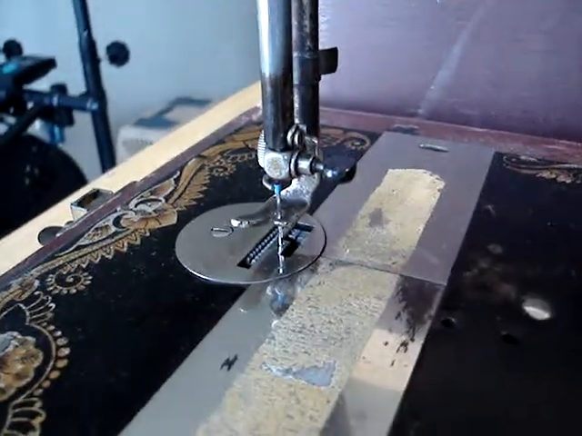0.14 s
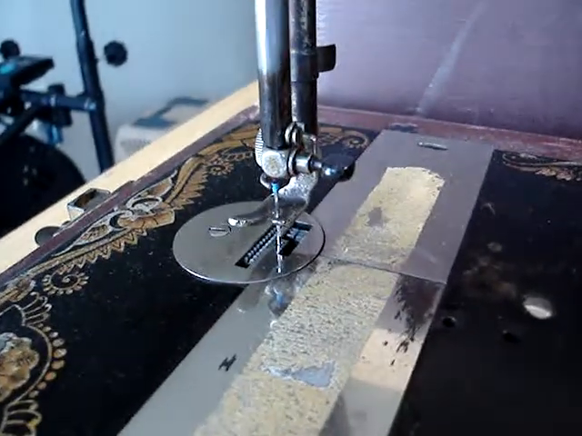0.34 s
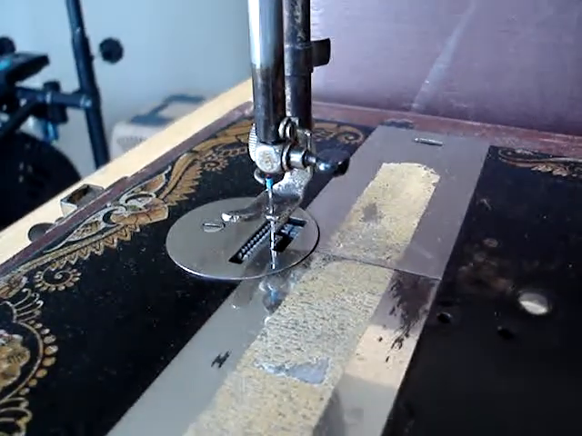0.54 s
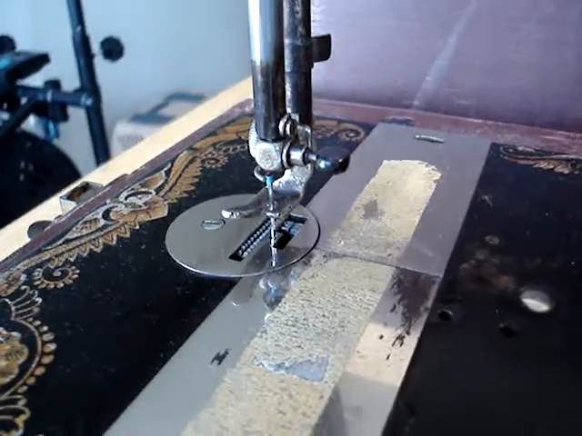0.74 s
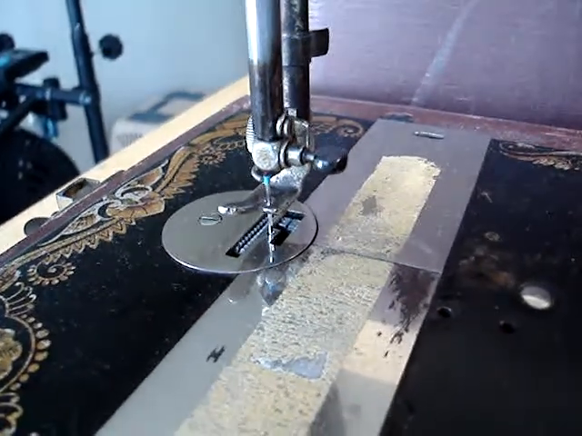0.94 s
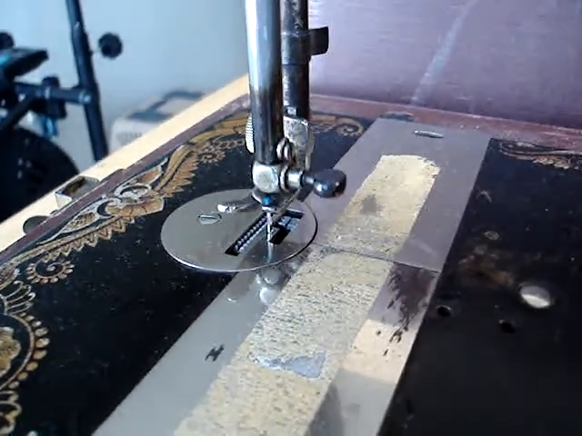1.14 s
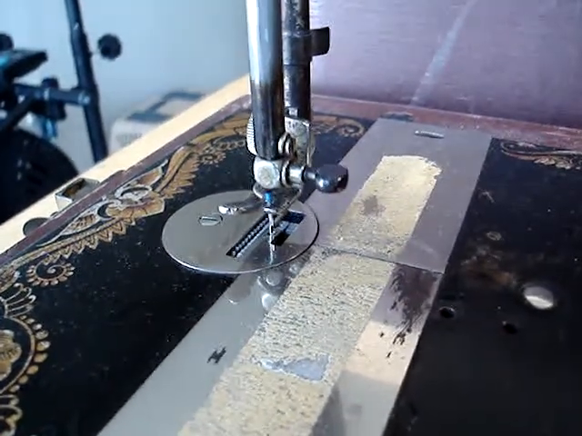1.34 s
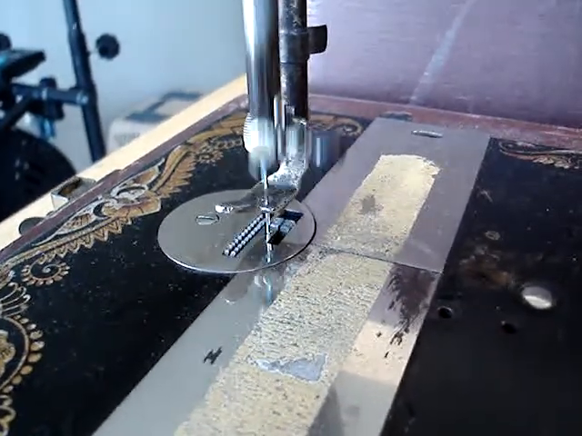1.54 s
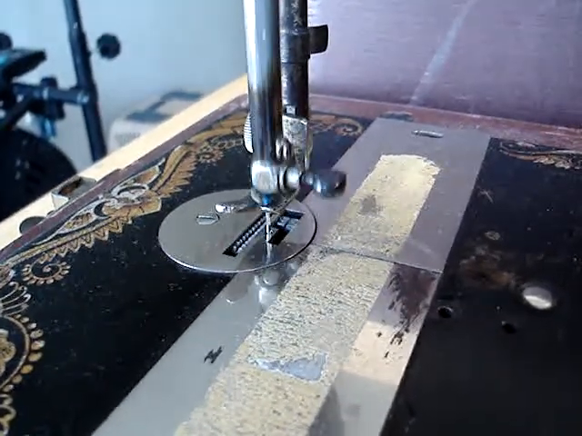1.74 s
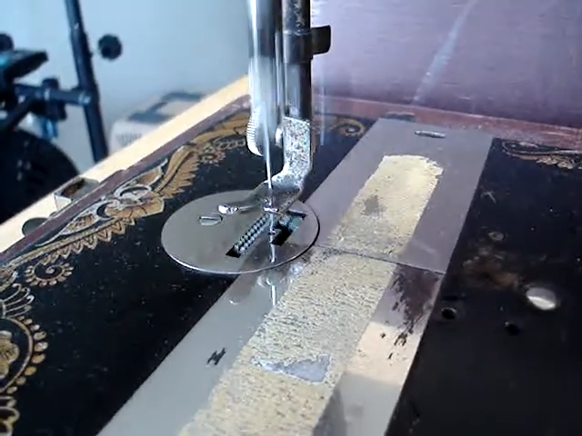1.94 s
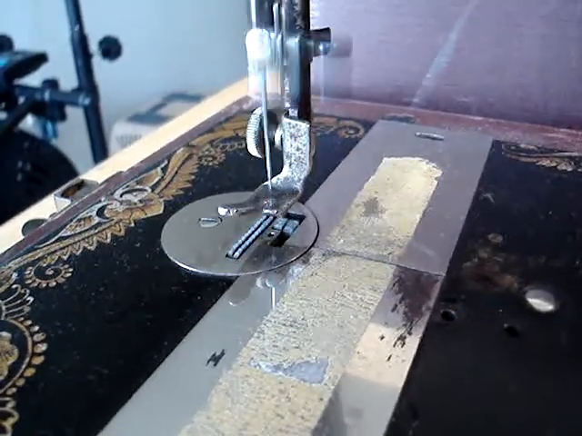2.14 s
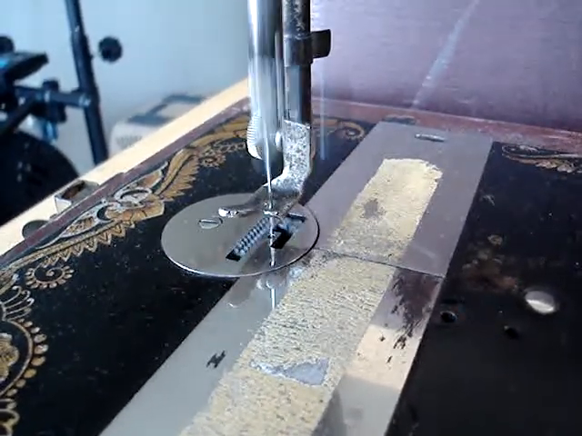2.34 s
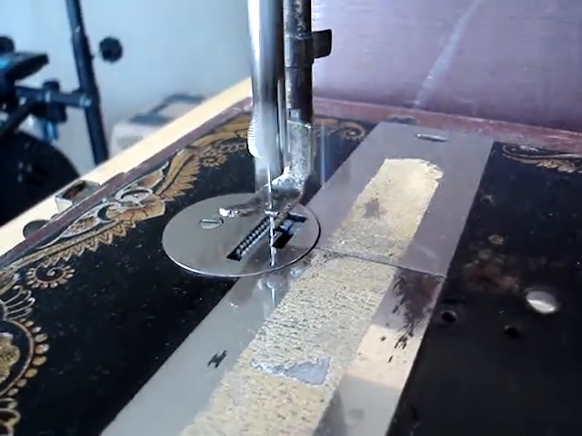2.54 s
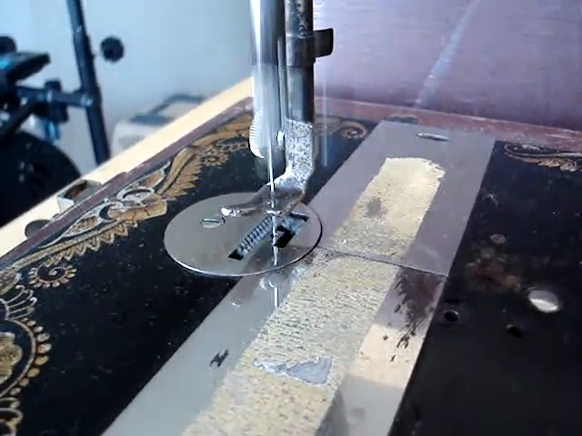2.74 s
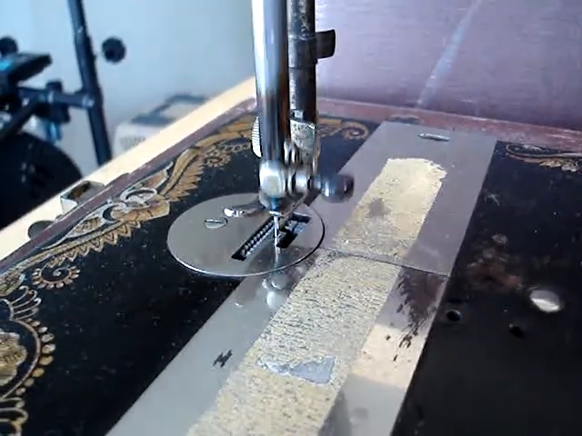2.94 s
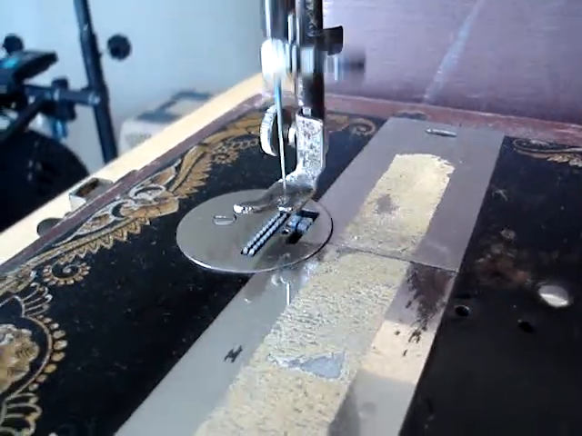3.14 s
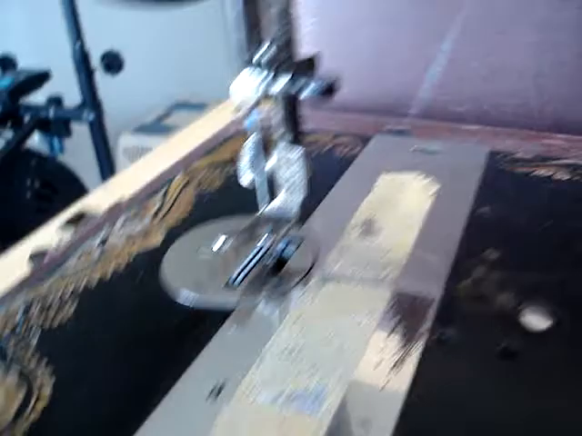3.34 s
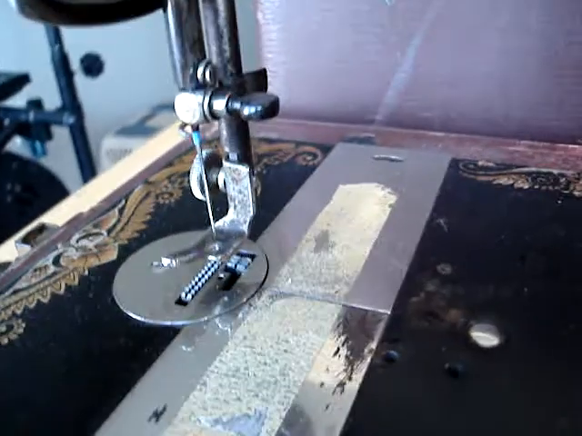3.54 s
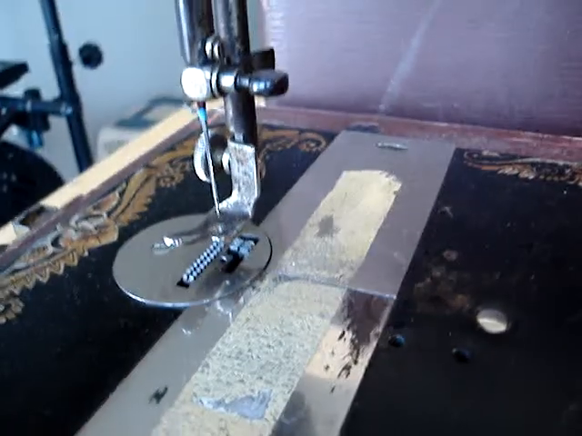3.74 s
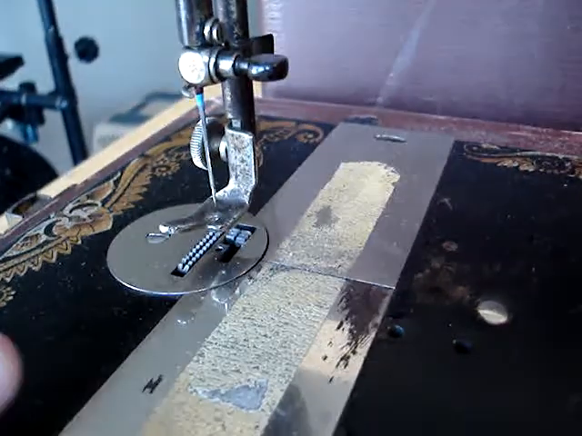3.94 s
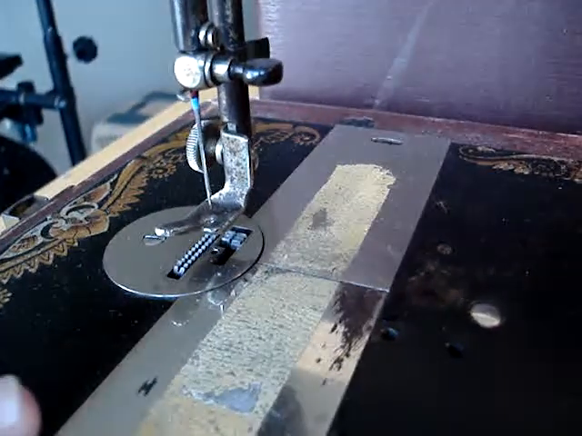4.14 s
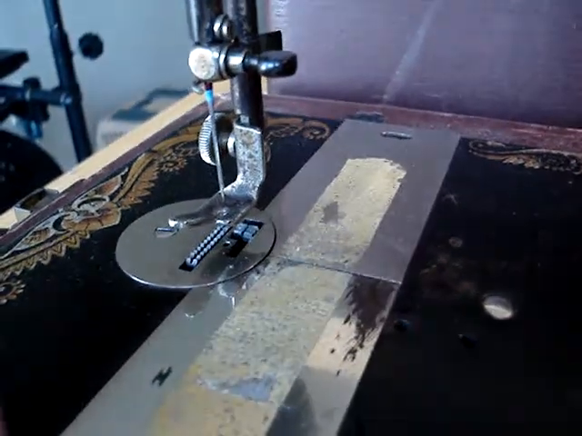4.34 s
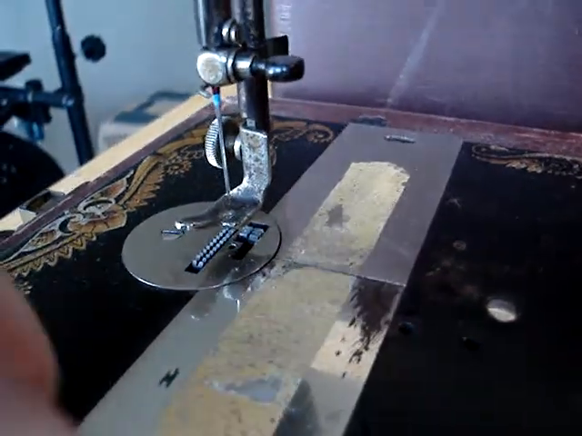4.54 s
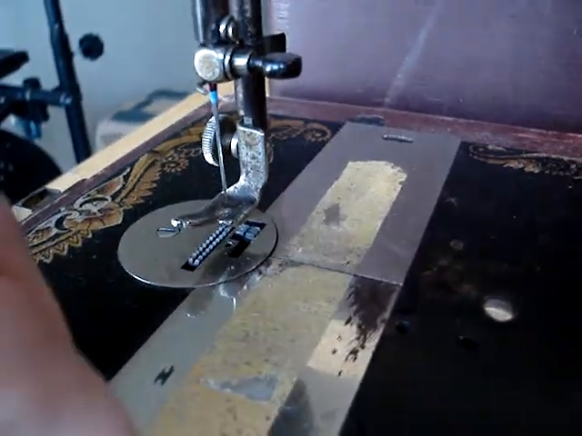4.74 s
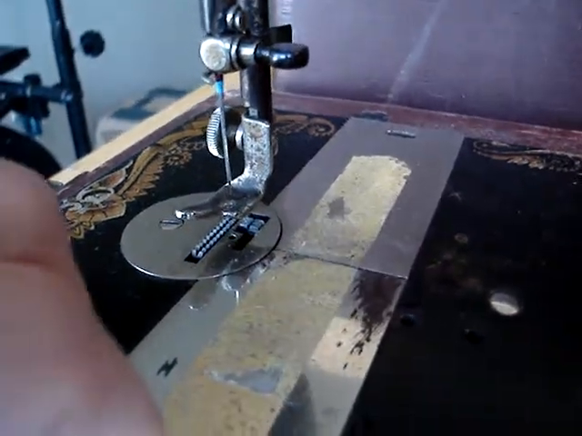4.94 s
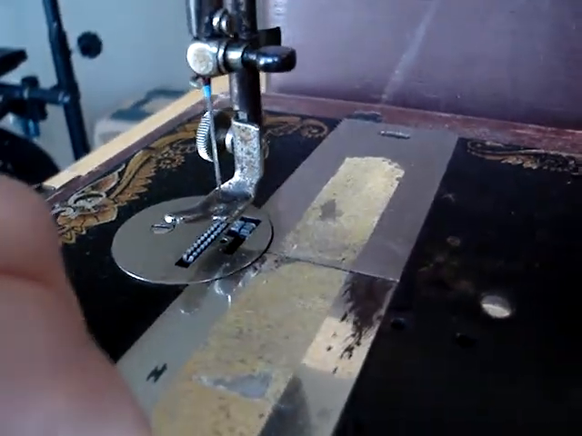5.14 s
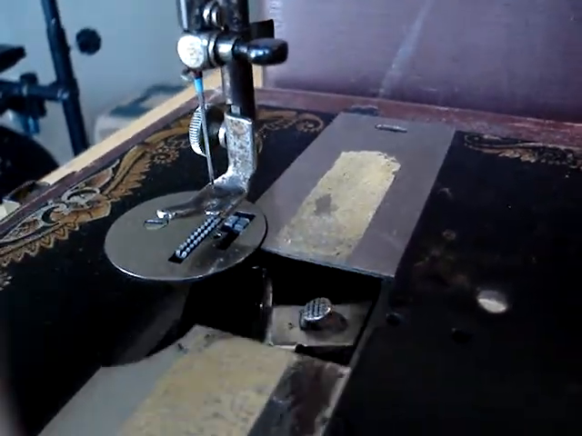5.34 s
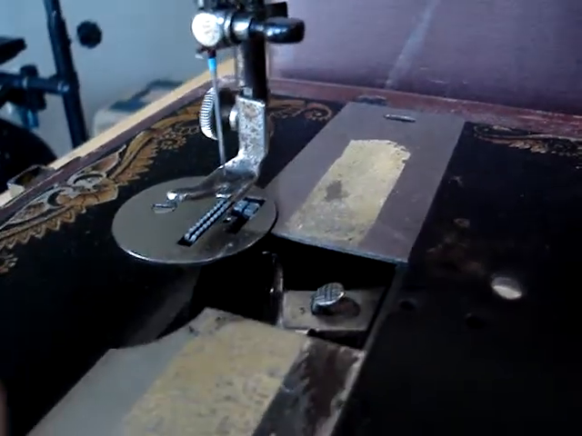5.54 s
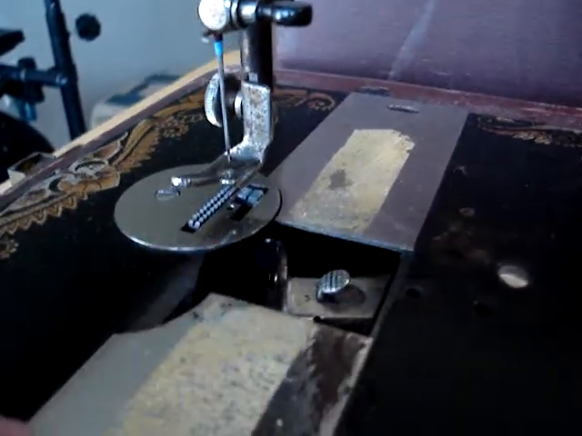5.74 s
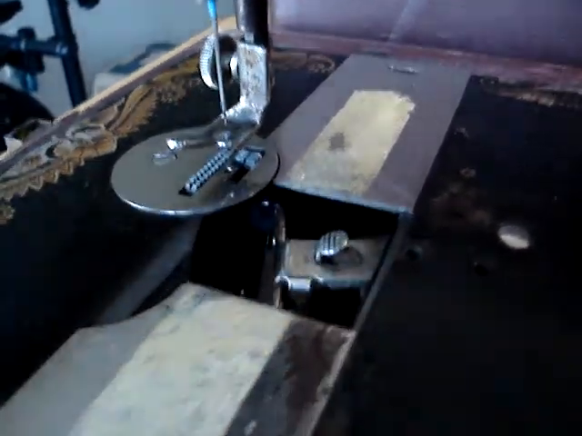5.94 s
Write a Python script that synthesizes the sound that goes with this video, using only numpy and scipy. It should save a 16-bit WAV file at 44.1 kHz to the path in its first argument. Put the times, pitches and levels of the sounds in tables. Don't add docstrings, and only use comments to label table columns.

```python
import sys
import numpy as np
from scipy import signal
from scipy.fft import rfft, irfft
from scipy.io import wavfile
from scipy.ndimage import uniform_filter1d, minimum_filter1d

SR = 44100
rng = np.random.default_rng(int(sys.argv[2]) if len(sys.argv) > 2 else 0)


def waveform_to_disk(signal):
    frames = np.transpose(np.atleast_2d(signal))
    scaled = np.clip(frames, -1, 1) * 32767
    samples = np.round(scaled).astype(np.int16)
    wavfile.write(sys.argv[1], SR, samples)


def gain_from_db(level_db):
    decades = np.asarray(level_db, float) / 20
    return 10 ** decades


N = 268128
TIME = np.arange(N) / SR


def unit(x):
    return x / np.sqrt(np.mean(x ** 2))


def gain(table):
    rows = np.array(table)
    return gain_from_db(np.interp(TIME, rows[:, 0], rows[:, 1], left=-150, right=-150))


def swell(rows, attack_s, release_s):
    total = 0
    for s, hold, db in rows:
        outside = np.maximum((s - TIME) / attack_s, (TIME - s - hold) / release_s)
        total = total + gain_from_db(db - 20 * np.clip(outside, 0, 8))
    return total


def bumps(moments, width_s):
    return sum(np.exp(-((TIME - s) / width_s) ** 2) for s in moments)


def ring(x, hz, width_hz):
    return signal.lfilter(*signal.iirpeak(hz, hz / width_hz, fs=SR), x)


def band(x, lo_hz, hi_hz):
    return signal.sosfilt(signal.butter(3, [lo_hz, hi_hz], "band", fs=SR, output="sos"), x)


def colour(x, points):
    hz, db = np.transpose(points)
    grid = np.maximum(np.arange(2049) * SR / 4096, 1)
    cep = irfft(np.log(gain_from_db(np.interp(np.log(grid), np.log(hz), db))))
    cep[1:2048] *= 2
    cep[2049:] = 0
    return signal.fftconvolve(x, irfft(np.exp(rfft(cep))))[:len(x)]


def walk(rate):
    k = int(SR / rate)
    steps = np.repeat(rng.standard_normal(N // k + 1), k)
    return unit(uniform_filter1d(uniform_filter1d(steps, k), k)[:N])


def grit(per_s, scatter_db):
    chance = rng.random((2, N))
    size = gain_from_db(scatter_db * np.minimum(-np.log(1 - chance[1]), 3))
    return unit((chance[0] < per_s / SR) * size * rng.standard_normal(N).clip(-2.5, 2.5))


def burst(decay_s, size=4096):
    return rng.standard_normal(size) * np.exp(-np.arange(size) / SR / decay_s)


def add(track, s, sound):
    i = int(s * SR)
    track[i:i + len(sound)] += sound[:N - i]


def strike(track, s, size):
    i, part = (s * SR).astype(int), s * SR % 1
    np.add.at(track, i, size * (1 - part))
    np.add.at(track, i + 1, size * part)


# f/Hz, spectral level/dB
ROOM_COLOUR = [(12, -41), (20, -18), (112, -21), (141, -8.5), (269, -2.5), (318, -5.5), (393, -3.5),
               (597, -7.5), (649, -10), (691, -11.5), (1010, -12.5), (1470, -21.5), (3000, -33.5),
               (3900, -68), (6600, -120)]
# f/Hz, width/Hz, level/dB
FAN_LINES = [(275.6, 2.5, -12), (393.3, 1.9, -15.5), (956, 3.7, -19)]
# f/Hz, spectral level/dB
HISS_COLOUR = [(600, -27), (1500, 1), (3000, 1.5), (6000, -4), (8000, -4), (10000, -11), (13000, -63.5)]


def room():
    duck_from_s, duck_to_s, duck_db, recover_db_per_s = 2.8, 2.83, -9, 4.5
    bass_duck_db, bass_back_s, hiss_duck = -9.5, 1, 0.25
    rumble_db, mic_hiss_db = -41, -57.5
    since = np.maximum(TIME - duck_to_s, 0)
    onset = np.clip((TIME - duck_from_s) / (duck_to_s - duck_from_s), 0, 1)
    duck = np.minimum(duck_db * onset + recover_db_per_s * since, 0)
    air = colour(rng.standard_normal(N), ROOM_COLOUR)
    bass_db = bass_duck_db * onset * np.exp(-since / bass_back_s)
    air = air + ring(air, 150, 240) * (gain_from_db(bass_db) - 1)
    flicker = sum(ring(air, hz, 0.63 * hz) * (gain_from_db(1.85 * walk(9.2)) - 1) for hz in [120, 300, 600, 1200])
    tones = sum(gain_from_db(db) * unit(ring(rng.standard_normal(N), hz, width)) for hz, width, db in FAN_LINES)
    fan_cycle = np.cumsum(647.6 + 1.66 * walk(8)) / SR
    tones = tones + gain_from_db(-7.5 + 0.66 * walk(12)) * np.sqrt(2) * np.sin(2 * np.pi * fan_cycle)
    hiss = unit(colour(rng.standard_normal(N), HISS_COLOUR))
    return (unit(air + flicker) + tones) * gain_from_db(rumble_db + duck) + hiss * gain_from_db(mic_hiss_db + hiss_duck * duck)


# t/s, hold/s, level/dB
SHAKE = [
    (1.82, 0.0082, -31),
    (1.892, 0.015, -35),
    (2.008, 0.1, -38.5),
    (2.2, 0.12, -56),
    (2.5, 0.028, -64),
]


def table_shake():
    return unit(band(rng.standard_normal(N), 8.5, 63)) * swell(SHAKE, 0.025, 0.047)


# t/s, peak level/dB, f/Hz, treble level/dB, treble f/Hz
TAPS = [(1.0837, -34, 1430, -23, 4030), (1.133, -18, 1480, -17, 5160), (3.215, -26.5, 900, 0.5, 3430),
        (3.222, -25, 510, -7, 3400), (3.285, -31, 1900, -6, 2700), (3.289, -36.5, 2320, -5, 2700),
        (3.292, -28, 1750, -8, 2800), (3.3105, -23.5, 2350, -8.5, 6100), (3.321, -29.5, 2450, -8, 3700),
        (4.3152, -42, 2300, 1, 3200), (4.538, -19.5, 1690, -11.5, 6340), (4.5455, -24, 1730, -19, 3000),
        (4.556, -33, 1720, -12, 3000), (4.567, -40, 1800, -5, 3400), (4.911, -36, 1050, -24, 3550),
        (5.342, -17.5, 440, -4, 1500), (5.3456, -23.5, 1210, -4, 2880), (5.353, -18.5, 940, -3.5, 2980),
        (5.3685, -10, 970, -1, 2970), (5.377, -25, 1310, -4, 3100), (5.373, -19.5, 1090, -6.5, 2400),
        (5.383, -27, 1000, -3, 3000), (5.388, -28, 900, -17, 2700), (5.838, -38, 1110, -6.5, 3990),
        (5.9258, -29, 1140, -11, 4500)]


def taps():
    out = np.zeros(N)
    for s, db, hz, top_db, top_hz in TAPS:
        tone = ring(ring(burst(.0006) + .1 * burst(.007), hz, 280), hz, 420)
        tone = tone + .35 * ring(tone, hz, 60)
        snap = ring(burst(0.0027), top_hz, 710) + 0.16 * band(burst(0.0016), 1800, 8000)
        snap = snap / np.abs(snap).max() + 1.5 * band(burst(.00008), 700, 7000)
        tap = 0.48 * tone / np.abs(tone).max() + gain_from_db(top_db) * snap / np.abs(snap).max()
        add(out, s, gain_from_db(db) * tap)
    return out


# t/s, hold/s, level/dB
SLIDE = [
    (5.312, 0.011, -48.5),
    (5.344, 0.013, -26),
    (5.41, 0.018, -45.5),
    (5.44, .03, -51),
]
# t/s, hold/s, level/dB
JERK = [
    (5.371, 0.015, -25.5),
    (5.394, 0.0076, -38),
]
# t/s, hold/s, level/dB
WHINE = [
    (5.957, 0.021, -46.5),
    (5.992, 0.011, -44.5),
    (6.018, .006, -54),
    (6.04, .012, -52),
]
# t/s, hold/s, level/dB
BRUSH = [
    (4.26, 0.39, -63),
    (5.93, 0.1, -52.5),
]
# f/Hz, spectral level/dB
PLATE_COLOUR = [(35, -47), (60, -24), (204, -46), (270, -10), (415, -5.5), (774, -14.5), (919, -7.5),
                (2080, -20), (2810, -16.5), (4510, -20), (5350, -17), (8410, -22), (10200, -44.5),
                (13300, -72.5), (22000, -120)]


def sliding_plate():
    scrape = colour(grit(9000, 1.0), PLATE_COLOUR)
    scrape = scrape + 1.15 * ring(scrape, 2780, 430) + 0.91 * ring(scrape, 1340, 306)
    scrape = scrape * gain_from_db(1.0 * walk(120))
    push = swell(SLIDE, 0.023, 0.015) + swell(JERK, 0.0056, 0.0091)
    brush = band(grit(6000, 1.2), 2300, 5800)
    rasp = grit(6500, 1.2)
    whine = ring(ring(rasp, 2780, 170), 2960, 400) + .25 * ring(rasp, 4800, 200)
    whine = unit(whine + 0.1 * band(rasp, 2600, 5500)) * swell(WHINE, .008, .012)
    return whine + unit(scrape) * push + unit(brush) * swell(BRUSH, 0.028, .1)


# t/s, hum level/dB
HUM = [
    (0.2, -79.5),
    (0.27, -52.5),
    (0.45, -59),
    (0.53, -47),
    (1.15, -34.5),
    (1.87, -32),
    (2.29, -51),
    (2.82, -54.5),
    (2.9, -71),
]
# t/s, hold/s, level/dB
BUZZ = [
    (.562, 0.34, -38.5),
]
# t/s, hold/s, share level/dB
BUZZ_ROUGH = [
    (.66, .03, -1),
    (.735, .01, -9),
    (.855, .05, -1),
]
# t/s, lag/ms
BUZZ_LAG = [(.53, -3.5), (.57, -1.6), (.68, -0.5), (.73, -1), (.75, -0.2), (.79, -1.2), (.84, -1.5),
            (.9, -2), (.93, -3.2)]
# f/Hz, spectral level/dB
BUZZ_COLOUR = [(880, -68), (1500, -38), (1660, -9), (1900, -4), (2060, -3), (2160, -33), (2620, -4.5),
               (2920, -1), (3340, -8), (4280, -8), (4700, -19.5), (7570, -21.5), (10000, -24.5),
               (13000, -67), (22000, -120)]
# f/Hz, width/Hz, level/dB
BUZZ_TREBLE = [(3720, 150, -5), (5320, 200, -11), (6500, 160, -15), (7280, 310, -13), (8500, 250, -15)]
# multiple of the hum [1], level/dB
BUZZ_ORDERS = [(6, -11), (10, -13), (15, -21), (17, -16)]


def motor():
    hum_hz = 119.9
    cycle = hum_hz * TIME
    hum = np.sqrt(2) * (np.sin(2 * np.pi * cycle) + gain_from_db(-22) * np.sin(4 * np.pi * cycle))
    beats = (np.arange(int(cycle[-1])) + 0.36) / hum_hz
    beats = beats + np.interp(beats, *np.transpose(BUZZ_LAG)) / 1000
    chance = rng.standard_normal((len(beats), 3)).T
    polarity = np.arange(len(beats)) % 2
    uneven = swell(BUZZ_ROUGH, 0.042, 0.027)[(beats * SR).astype(int).clip(0, N - 1)]
    beats = beats + uneven * (.00011 * polarity + .00003 * chance[0])
    beats = beats + .00008 * walk(11)[(beats * SR).astype(int).clip(0, N - 1)]
    ticks, rebound, sharp = np.zeros((3, N + SR))
    strike(ticks, beats, gain_from_db(.9 * chance[1]))
    strike(ticks, beats - .00033, gain_from_db(-4 + chance[2]))
    strike(ticks, beats - .00068, gain_from_db(-10 + 2 * chance[0]))
    strike(rebound, beats + .0012 + .00004 * chance[2], gain_from_db(1.5 * chance[0]))
    strike(ticks, beats + .0018 + .00004 * uneven * chance[2], gain_from_db(-7))
    strike(ticks, beats + .0047 + .0001 * uneven * chance[1], gain_from_db(-15))
    strike(sharp, beats, gain_from_db(1.5 * chance[2]))
    breeze = gain_from_db(-41) * rng.standard_normal(N)
    puff = signal.fftconvolve(ticks, np.hanning(90))[:N] + .5
    fizz = band(puff * rng.standard_normal(N), 4300, 9000)
    buzz = colour(band(ticks[:N], 600, 4800) + breeze + gain_from_db(-21) * fizz, BUZZ_COLOUR)
    buzz = unit(buzz + .6 * ring(buzz, 3050, 300) + 1.2 * ring(buzz, 2420, 130))
    buzz = unit(buzz + gain_from_db(-8.5) * unit(ring(ring(rebound[:N], 2500, 300), 2500, 340)))
    treble = sum(gain_from_db(db) * unit(ring(sharp[:N], hz, width)) for hz, width, db in BUZZ_TREBLE)
    windings = sum(gain_from_db(db) * np.sin(2 * np.pi * order * cycle) for order, db in BUZZ_ORDERS)
    buzz = buzz + gain_from_db(-9.5) * treble + windings
    return hum * gain(HUM) + buzz * swell(BUZZ, 0.034, 0.062)


# shuttle catch t/s, needle bar drop t/s, strength level/dB
STITCHES = [
    (1.7955, 1.896, -2),
    (2.0426, 2.1224, -4.5),
    (2.247, 2.314, -2),
    (2.435, 2.512, -3),
    (2.61, 2.687, 0),
    (2.811, 2.867, -3),
    (2.983, 3.087, -4),
]


def moment(turn):
    catch_turn = .61
    turns = np.arange(len(STITCHES))[:, None] + [catch_turn - 1, 0]
    return np.interp(turn, turns.ravel(), np.array(STITCHES)[:, :2].ravel())


def squeal(rows, hz, waver_hz, patchy_db, scrape_db, sag=.045):
    knots = []
    for s, hold, _ in rows:
        knots += [(s - .045, 0), (s, 1), (s + hold + .012, 0)]
    pull = np.interp(TIME, *np.array(sorted(knots)).T)
    pitch = hz * (1 + sag * (pull - .5)) + waver_hz * walk(90)
    tone = np.sqrt(2) * np.sin(2 * np.pi * np.cumsum(pitch) / SR) * gain_from_db(patchy_db * walk(140))
    scrape = unit(ring(grit(8000, 1), hz, 130))
    return (tone + gain_from_db(scrape_db) * scrape) * swell(rows, 0.03, 0.017)


# t/s, hold/s, level/dB
SQUEAL_LOW = [
    (.965, 0.071, -53.5),
    (1.06, 0.023, -48.5),
    (1.1, 0.069, -39.5),
    (1.21, 0.0384, -47.5),
    (1.3, 0.017, -40),
    (1.4, 0.042, -46),
]
SQUEAL_MID = [
    (1.505, 0.013, -56),
    (1.6, 0.0748, -51),
    (3.1, 0.11, -48.5),
]
SQUEAL_HIGH = [
    (1.395, .075, -50),
    (1.51, 0.04, -43),
    (1.585, .05, -40.5),
               (3.1, .09, -46),
]
# t/s, hold/s, level/dB
SQUEAL_FIRST = [
    (1.845, .04, -34.5),
    (2.1, 0.014, -37),
    (2.665, 0.017, -35),
    (2.85, .012, -37),
]
# t/s, hold/s, level/dB
SQUEAL_END = [
    (1.635, 0.055, -40.5),
    (3.2, 0.069, -52.5),
]


def bearings():
    def sing(db):
        return [(moment(k), moment(k + .145) - moment(k), db + STITCHES[k][2]) for k in range(len(STITCHES) - 1)]

    low = squeal(SQUEAL_LOW, 1470, 25.3, patchy_db=2.0, scrape_db=-5, sag=.02)
    mid = squeal(SQUEAL_MID + sing(-43), 3125, 32, patchy_db=3, scrape_db=-6)
    high = squeal(SQUEAL_HIGH + sing(-31.5), 4215, 28, patchy_db=2.5, scrape_db=-8)
    high = high + squeal(SQUEAL_FIRST, 4240, 25, patchy_db=5.0, scrape_db=-6.5, sag=0.0089)
    return low + mid + high + squeal(SQUEAL_END, 3500, 40, patchy_db=2.5, scrape_db=-2, sag=0.012)


# f/Hz, spectral level/dB
IRON_COLOUR = [(71, -21), (120, -7), (191, -0.5), (226, -10), (334, 1), (394, 1), (639, -7), (980, -2),
               (1560, 5.5), (1810, -0.5), (2630, 0.5), (4260, 3.5), (6060, -3.5), (8470, -21), (10200, -86),
               (13300, -43.5), (22000, -120)]
# f/Hz, width/Hz, level/dB
IRON_MODES = [(177, 12, -21), (337, 23, -15), (800.4, 25, -6), (996, 18, -4), (1162, 130, -14),
              (1480, 180, -43.5), (1996, 55, -12), (2520, 210, -7), (2715, 150, -5.5), (3130, 140, -2),
              (3500, 110, -12), (4230, 170, -9.5), (5200, 15, -4.5), (6840, 79, 6.5)]


def iron(x, modes_db, patchy_db):
    broad = colour(x, IRON_COLOUR)
    modes = 0
    for hz, width, db in IRON_MODES:
        coupling = gain_from_db(patchy_db * min(hz / 2000, 1) * walk(25.17))
        modes = modes + gain_from_db(db) * ring(broad * coupling, hz, width)
    return broad + gain_from_db(modes_db) * modes


# t/s, bright level/dB
RUB = [
    (0.9, -58.5),
    (1.15, -53),
    (1.53, -41),
    (1.81, -26.5),
    (1.96, -25),
    (2.88, -28),
    (3.06, -30.5),
    (3.26, -53.5),
    (3.32, -61),
]
# f/Hz, spectral level/dB
RUB_HISS = [(4000, -4.5), (5200, 6.5), (6300, 1.5), (7200, 6.5), (8400, 5.5), (9300, -3), (10200, -26)]
# t/s, hold/s, level/dB
BELT_SLIP = [
    (1.58, 0.07, -44.5),
    (3.16, 0.044, -47.5),
]
HARD_S = [1.177, 1.795, 2.042, 2.617, 2.6895, 2.7964, 2.9846]


def rubbing():
    slack = moment(np.arange(len(STITCHES) - 1) + .235)
    flights = [row[0] - .008 for row in BLOWS + stitching()]
    load_db = -4 * bumps(slack, 0.012) - 1 * bumps(flights, 0.0038)
    load_db = load_db - 2 * bumps(np.array(HARD_S) - 0.0033, 0.0031)
    chatter = sum((TIME > s) * np.exp(-np.abs(TIME - s) / 0.01) for s, *_ in CAMS)
    load = gain_from_db(load_db + 3 * chatter - 1.5)
    effort = gain(RUB) / gain_from_db(-26)
    running = effort > 1e-4
    contact = iron(grit(7000, 1.7) * gain_from_db(1.3 * walk(130)), modes_db=9, patchy_db=2.5)
    bright = unit(band(contact, 2270, 6420)) * gain_from_db(1.0 * walk(50)) * gain(RUB)
    body = unit(band(contact, 130, 1446)) * gain_from_db(-26 + 1.26 * walk(35.1)) * effort ** 0.68
    hiss_gain = gain_from_db(-35.5) * effort ** 0.92 + swell(BELT_SLIP, 0.035, 0.017)
    hiss = unit(colour(grit(12000, 1.3), RUB_HISS)) * gain_from_db(2.7 * walk(24)) * hiss_gain
    return load * running * (bright + body + hiss)


# t/s, peak level/dB, knock level/dB, f/Hz
CAMS = [(1.9138, -14, -5, 1440), (1.9592, -16.5, -5, 3410), (1.983, -15.5, -13, 3180),
        (2.0058, -16, -4.5, 1370), (2.0417, -6.5, -25.5, 2500), (2.068, -14, -7.5, 2470),
        (2.0772, -12, -2, 1270), (2.0926, -11.5, -5, 2450), (2.1017, -10.5, -22, 1570),
        (2.1236, -5.5, -16, 3170), (2.1369, -8.5, -13.5, 1400), (2.1853, -14.5, -30, 3060),
        (2.1984, -12, 0, 2990), (2.2157, -11.5, -23.5, 1205), (2.2433, -15, -25, 1390),
        (2.2703, -10, -7.5, 4700), (2.2904, -8, -13, 2530), (2.3183, -6, -27.5, 4440),
        (2.338, -11, -17.5, 3100), (2.372, -11, -15, 3260), (2.388, -18, -20, 3100),
        (2.4065, -13, -31, 1970), (2.4345, -12, -20.5, 1360), (2.4581, -7, -15, 3090),
        (2.4838, -11, -24, 3800), (2.5061, -6.5, -17.5, 4370), (2.526, -16.5, -26.5, 4260),
        (2.5633, -8, -25, 3600), (2.5914, -13, -16, 1170), (2.617, -6, -23, 2550), (2.6419, -19, -10, 1620),
        (2.6625, -11.5, -10.5, 1240), (2.6888, -5, -22, 3270), (2.6998, -11.5, -23.5, 4230),
        (2.7383, -12, -17, 3500), (2.756, -20.5, -18, 3210), (2.7728, -13.5, -18, 4280),
        (2.7966, -9, -21.5, 2310), (2.8247, -24, -15, 3200), (2.8454, -11, -26, 1280),
        (2.8664, -6, -17.5, 3130)]


def stitching():
    return [(*row, -12.5) for row in CAMS]


# t/s, peak level/dB, knock level/dB, f/Hz, rattle level/dB
BLOWS = [(1.177, -12, -15.5, 2320, -39), (1.191, -25, -9, 2500, -19), (1.271, -17.5, -3, 2520, -16.5),
         (1.301, -27.5, 2, 1490, -18), (1.3873, -23, -1.5, 2480, -29), (1.4536, -22.5, -5.5, 4560, -29),
         (1.5051, -12, -8, 3050, -26.5), (1.5306, -23, 2, 1710, -4), (1.577, -24, 0, 1630, -7),
         (1.7282, -19.5, 0, 1430, -3), (1.794, -8, -32, 1440, -24.5), (1.8223, -7.5, -6.5, 3500, -32),
         (1.832, -14, 5, 840, -26.5), (1.8524, -12, -4.5, 4370, -8), (1.892, -3.5, -6, 4230, -20),
         (1.9, -7.5, -19, 1390, -22), (1.907, -6.5, -11.5, 4370, -20), (2.897, -44, -16, 4200, -18),
         (2.9551, -16, -28, 2520, -9), (2.985, -8.5, -26, 2460, -15), (3.022, -7.5, -11.5, 3620, -27),
         (3.09, -12.5, -9.5, 3010, -33), (3.1099, -23.5, -3, 1400, -34)]


def blows():
    crack, part, knock, spit = np.zeros((4, N))
    for s, db, low_db, hz, top_db in BLOWS + stitching():
        hard = np.abs(s - np.array(HARD_S)).min() < .004
        rise_s = .0007 if hard else .0036
        rise = 1 - np.exp(-np.arange(4096) / SR / rise_s)
        hit = rise ** .8 * (burst(.0026) + .18 * burst(.009))
        hit = hit / np.abs(hit).max()
        hit[60] += .7 + 1.1 * hard
        s = s - .0008
        add(crack, s, gain_from_db(db) * hit / np.abs(band(hit, 1500, 6000)).max())
        tone = ring(hit, hz, 81)
        add(part, s, gain_from_db(db) * tone / np.abs(tone).max())
        add(knock, s, gain_from_db(db + low_db) * .33 * unit(burst(.009)[:1200]))
        add(spit, s, gain_from_db(db + top_db) * rise * burst(.011))
    crack = band(iron(crack, modes_db=-5, patchy_db=1), 1284, 5900)
    thump = ring(knock, 190, 28) + ring(knock, 298, 60)
    knock = band(iron(knock, modes_db=13.0, patchy_db=1.5), 77, 1010) + thump
    return gain_from_db(-3.5) * crack + gain_from_db(-9) * part + gain_from_db(11.5) * knock + gain_from_db(0.5) * band(spit, 4200, 8330)


def thin_treble(x, margin_db, from_hz):
    hz, _, spec = signal.stft(x, SR, nperseg=256)
    bands = spec[:128].reshape(32, 4, -1)
    db = 10 * np.log10((np.abs(bands) ** 2).sum(axis=1) + 1e-20)
    near = -minimum_filter1d(-uniform_filter1d(db, size=3, axis=1), size=11, axis=1)
    need = margin_db + 6.2 * np.clip(from_hz - hz[:128:4], 0, None)[:, None] / 1000
    need = need - 0.1 * np.clip(uniform_filter1d(db.max(axis=0), size=30) + 49.5, 0, 30)
    held = uniform_filter1d((db < near - need) * 1., size=3, axis=1) > .3
    spec[:128] *= np.repeat(1 - .97 * held, 4, axis=0)
    return signal.istft(spec, SR, nperseg=256)[1][:N]


def scene():
    tapping = taps() + sliding_plate()
    near = motor() + rubbing() + bearings() + blows() + .4 * tapping
    tail = signal.fftconvolve(near, burst(0.057, size=12000))[:N]
    return (near + 0.63 * tapping + gain_from_db(-42.5) * tail + table_shake() + room())[None]


def top_cut(x):
    return signal.sosfilt(signal.butter(12, 10350, fs=SR, output="sos"), x)


def record(dry):
    soft = np.tanh(1.523 * dry[0]) / 1.72
    thin = thin_treble(soft, margin_db=9.5, from_hz=5400)
    cut = signal.sosfilt(signal.ellip(8, .2, 70, 10150, fs=SR, output="sos"), thin)
    return top_cut(cut[None])


dry = scene()
out = record(dry)
waveform_to_disk(out)
```